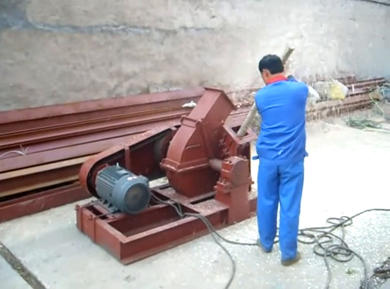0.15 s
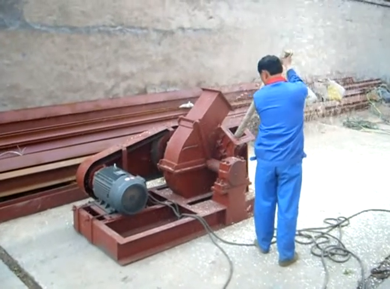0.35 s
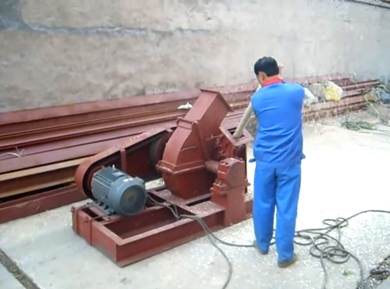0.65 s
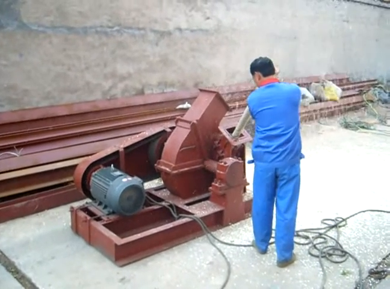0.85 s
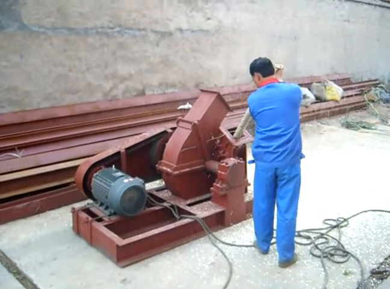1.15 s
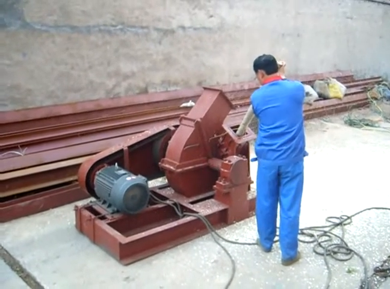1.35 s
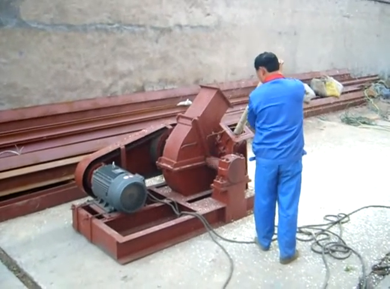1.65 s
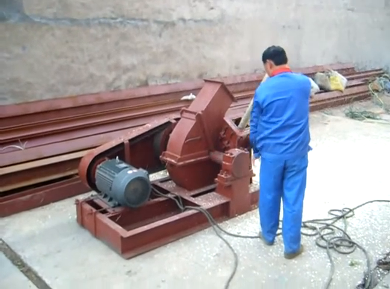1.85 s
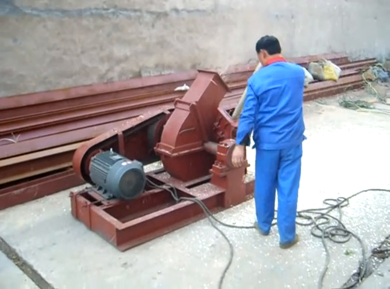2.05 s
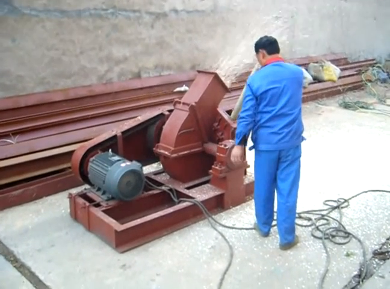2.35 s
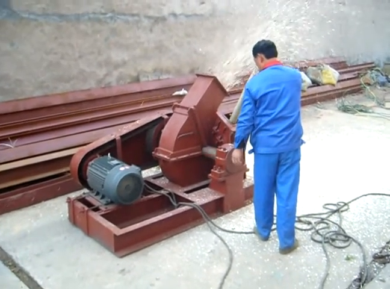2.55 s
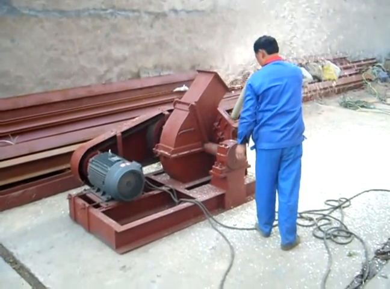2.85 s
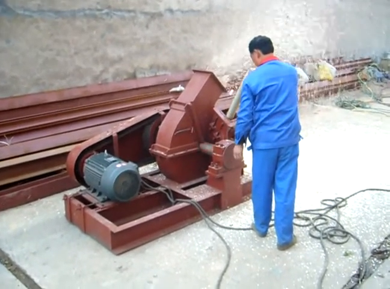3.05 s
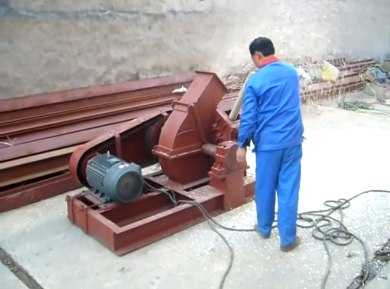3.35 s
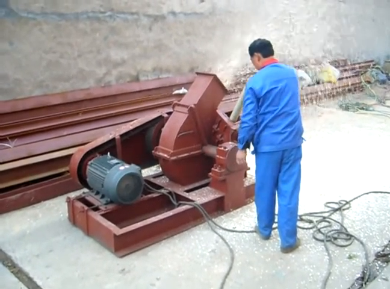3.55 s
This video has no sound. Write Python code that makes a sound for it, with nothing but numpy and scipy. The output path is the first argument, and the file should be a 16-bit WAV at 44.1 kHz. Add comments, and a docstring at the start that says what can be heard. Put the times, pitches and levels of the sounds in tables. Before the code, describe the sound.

Wood chipper idles with pulsing air, then roars harshly as its knives shred a new log.

```python
"""A belt-driven three-knife disc chipper runs in a walled yard: tones hum and pulsing noise is the churned air.
The last log's chips die away as crackling noise, then a new log knocks on the steel chute in decaying tones.
Stray chips rattle as noise bursts and a knife grazes the log. Then the knives bite: each stroke gates
splintering and judder, steel resonances ring, the spout booms on a wandering tone and the wood squeaks.
The yard answers with a short noise tail; the roar overloads a small camera microphone."""
import sys
import numpy as np
from scipy import signal
from scipy.fft import rfft, irfft, next_fast_len
from scipy.io import wavfile
from scipy.ndimage import uniform_filter1d, map_coordinates

SR = 44100
rng = np.random.default_rng(int(sys.argv[2]) if len(sys.argv) > 2 else 0)


def transcribe(signal):
    """Save signal, clipped to [-1, 1], as a 16-bit WAV file at the path in sys.argv[1]."""
    frames = np.atleast_2d(signal).T
    limited = np.clip(frames, -1, 1)
    pcm = np.round(limited * 32767).astype(np.int16)
    wavfile.write(sys.argv[1], SR, pcm)


N = 164052  # 3.72 s
TIME = np.arange(N) / SR

DISC_HZ = 13.75  # turns a second
TURN_SAMPLES = round(SR / DISC_HZ)
# where each of the three knives sits in a turn [lag/s]
KNIFE_LAG_S = [0, 0.0218, 0.0469]
# spectrum of splintering wood [f/Hz, relative level per Hz/dB]
SPLINTER = [(60, -25), (300, -6), (700, -1.5), (1000, 1.5), (1800, -4), (2400, -1), (3300, -14.5),
            (4200, -11), (5200, -11), (6500, -17)]
# spectrum of the log juddering against the anvil [f/Hz, relative level per Hz/dB]
JUDDER = [(25, -13), (78, -19), (105, -3), (140, -6), (175, -7.5), (220, -4), (330, -3), (560, -8),
          (900, -4), (1600, -21.5), (4000, -27.5)]
# load on the machine [t/s, judder level/dB, housing ring level/dB, spout boom level/dB]
LOAD = [(1.92, -31, -48.5, -57), (2.0, -27.5, -34.5, -35), (2.08, -16, -15.5, -21), (2.17, -12, -13, -17),
        (2.32, -13.5, -20.5, -24), (2.52, -15.5, -18.5, -26), (2.75, -10.5, -10.5, -14),
        (3.0, -11, -8.5, -20), (3.2, -9.5, -11, -17), (3.42, -13.5, -6.5, -21), (3.53, -9, -7, -14),
        (3.7, -12, -5, -15)]


def amp(db):
    """Decibels to gain."""
    return 10 ** (np.asarray(db) / 20)


def unit(x):
    """Scale to rms 1."""
    return x / np.sqrt(np.mean(x ** 2) + 1e-20)


def filtered(x, response):
    """x times a response of frequency, padded so that the end does not wrap onto the start."""
    m = next_fast_len(N + SR // 2)
    return irfft(rfft(x, m) * response(np.fft.rfftfreq(m, 1 / SR)), m)[:N]


def coloured(x, points):
    """x shaped by a spectrum of (Hz, dB) points, deep bass rolled off, rms 1."""
    f, db = np.transpose(points)

    def response(hz):
        bass_cut = hz / (hz + 10)
        return amp(np.interp(np.log(hz + 1), np.log(f), db)) * bass_cut
    return unit(filtered(x, response))


def gains(rows):
    """One gain per sample for each dB column after the time; silent before the first row."""
    s, *columns = np.transpose(rows)
    return [amp(np.interp(TIME, s, db, left=-np.inf)) for db in columns]


def wobble(rate):
    """A smooth random curve, rate knots a second."""
    knots = rng.standard_normal(int(N * rate / SR) + 4)
    return map_coordinates(knots, [TIME * rate])


def turning_noise(repeat):
    """Noise of which a share of the power (0 to 1) comes back alike on every turn of the disc."""
    phases = 2 * np.pi * rng.random(TURN_SAMPLES // 2 + 1)
    turn = unit(irfft(np.exp(1j * phases), TURN_SAMPLES))
    return np.sqrt(repeat) * np.resize(turn, N) + np.sqrt(1 - repeat) * rng.standard_normal(N)


def strokes():
    """Strength of the cut: each knife bites, shears through and lets go once a turn."""
    # depth of cut [t/s, first knife relative level/dB, second knife relative level/dB,
    # third knife relative level/dB]
    bite = [(1.93, -23.5, -37, -31), (2.005, -18, -17.5, -16), (2.04, -1.5, -7, -8), (2.12, -3.5, -5, -2.5),
            (2.2, -2.5, -10.5, -5.5), (2.28, -5.5, -12.5, -4.5), (2.5, -8.5, -13, -11.5),
            (2.559, -8, -14.5, -11), (2.641, 1, -4, -7), (2.8, -6.5, -13.5, -7.5),
            (2.899, -4.5, -3.5, -0.5), (3.07, -3, -8, -8), (3.2, -4, -10, -7), (3.421, -14, -15, -4),
            (3.48, -3, -10.5, -4.5), (3.7, -7.5, -6.5, -8.5)]
    bite_phase_s = 2.0355  # a moment when the first knife enters
    attack_s, hold_s, release_s, scatter_db = 0.0064, 0.0077, 0.018, 1.5
    snap_db, snap_s, snap_width_s = -4, 0.0038, .002
    tear_db, tear_hz = 1, 258

    power = np.zeros(N)
    for lag, depth in zip(KNIFE_LAG_S, gains(bite)):
        since = TIME - bite_phase_s - lag
        age = since % (1 / DISC_HZ)
        turn = (since * DISC_HZ // 1).astype(int)
        rise = np.minimum(age / attack_s, 1)
        release = np.exp(-np.maximum(age - attack_s - hold_s, 0) / release_s)
        # the chip cracks off just after the knife enters
        snap = amp(snap_db) * np.exp(-((age - snap_s) / snap_width_s) ** 2)
        scatter = amp(scatter_db * rng.standard_normal(size=64)[turn])
        power += (depth * (rise * release + snap) * scatter) ** 2
    # the fibres give way in like jerks on every turn
    tearing = np.resize(wobble(tear_hz)[:TURN_SAMPLES], N)
    return np.sqrt(power) * amp(tear_db * tearing)


def splinters():
    """Crackling noise of breaking wood; patches in time and frequency give the chips their own colours."""
    repeat, crackle, patchy_db = 0.16, .45, 2.5
    crackling = turning_noise(repeat) * np.exp(crackle * wobble(900))
    z = signal.stft(crackling, nperseg=256)[2]
    patches = uniform_filter1d(rng.standard_normal(z.shape), size=4, axis=0)
    patches = unit(uniform_filter1d(patches, size=8, axis=1))
    patchy = signal.istft(z * amp(patchy_db * patches), nperseg=256)[1][:N]
    return coloured(patchy, SPLINTER)


def cutting():
    """The strokes splinter the wood, shake the log and excite the resonances of the steel housing."""
    # resonances of the steel housing [f/Hz, width/Hz, relative level/dB]
    housing = [(472, 24, -6.5), (646, 30, -7), (830, 37, -7.5), (895, 73, -12), (1025, 20, -2),
               (1150, 54, 2), (1235, 41, -1), (1349, 48, -6.5), (1447, 50, -18), (1697, 48, -8.5),
               (2322, 40, -9.5)]
    # strong multiples of the disc speed under load [multiple of DISC_HZ]
    multiples = [10, 11, 15, 20, 22, 24, 33]
    # their peak levels relative to the judder [level/dB]
    multiples_db = [-13, -14, -12.5, -14, -15, -15, -16]
    splinter_db, judder_repeat, ring_repeat = -2.5, 0.68, 0.11

    cut = strokes()
    beat = cut / (uniform_filter1d(cut, TURN_SAMPLES) + 1e-4)  # pulse of the strokes without their loudness
    cutting_rms = np.sqrt(np.mean(cut > 0))  # makes rms 1 hold over the cutting time alone
    judder_gain, ring_gain, _ = gains(LOAD)
    judder = coloured(beat * turning_noise(judder_repeat), JUDDER) * cutting_rms

    orders = np.zeros(N)
    for k, db in zip(multiples, multiples_db):
        phase = 2 * np.pi * (k * DISC_HZ * TIME + rng.random()) + 0.21 * wobble(6)
        orders += amp(db) * np.sin(phase)

    def steel(f):
        return sum(amp(db) * 1j * f * w / (c * c - f * f + 1j * f * w) for c, w, db in housing)
    ring = unit(filtered(beat * turning_noise(ring_repeat), steel)) * cutting_rms
    return amp(splinter_db) * cut * splinters() + judder_gain * (judder + orders) + ring_gain * ring


def spout():
    """The sheet steel of the spout booms in surges on a wandering tone as chips stream through it."""
    boom_hz, wander_rad, surge_db = 487, .8, 2
    boom_gain = gains(LOAD)[2]
    tone = np.sin(2 * np.pi * boom_hz * TIME + wander_rad * wobble(25))
    return boom_gain * unit(amp(surge_db * wobble(25.03)) * tone)


def squeaks():
    """Short squeals, roughened in phase, where the log rubs on a passing knife."""
    # wood squeaks against the knives [t/s, f/Hz, rms level at the swell's top/dB]
    squeals = [(2.24, 3120, -15), (2.335, 5450, -17.5), (2.39, 5450, -18), (2.41, 5350, -25),
               (2.46, 5400, -20.5), (2.482, 5400, -16.5), (2.53, 5400, -19.5), (2.556, 5450, -15),
               (2.608, 5500, -21), (2.68, 5350, -18), (2.70, 5450, -18), (2.97, 5200, -14.5),
               (3.047, 5500, -16.5), (3.12, 5400, -17), (3.49, 5400, -16), (3.556, 5500, -15)]
    width_s, rough_rad = .01, 1.1
    out = np.zeros(N)
    for s, hz, db in squeals:
        swell = np.exp(-((TIME - s) / width_s) ** 2)
        out += amp(db) * swell * np.sin(2 * np.pi * hz * TIME + rough_rad * wobble(900))
    return np.sqrt(2) * out


def knock():
    """The new log lands on the steel chute: a hard touch and a crack, then decaying modes and clatter."""
    # modes of the struck chute [f/Hz, relative level/dB, t60/s]
    modes = [(430, -1, .1), (509, -2, .1), (651, 2.5, .12), (681, -3.5, .12), (830, -2, .14),
             (1192, 2, .12), (1600, -5.5, 0.25), (1870, -11.5, 0.3), (1950, -7, 0.15), (3241, -15.5, .12)]
    # spectrum of the chute's loose sheet rattling on [f/Hz, relative level per Hz/dB]
    loose_sheet = [(300, -0.5), (700, -6), (1200, 3.5), (2000, -1), (2600, -6.5), (5500, -18)]
    # spectrum of the crack [f/Hz, relative level per Hz/dB]
    crack_colour = [(150, -7), (450, 13), (2000, -21), (3000, -21), (5500, -25)]
    knock_s, ring_db = .4295, -13
    crack_db, crack_t60 = -7, 0.11
    clatter_db, clatter_t60 = -17.5, 0.44
    contact_db, contact_decay_s = -11, .0025

    def noise(colour):
        return coloured(rng.standard_normal(N), colour)

    t = np.maximum(TIME - knock_s, 0)
    ring = sum(amp(db - 60 * t / t60) * np.sin(2 * np.pi * (hz * t + rng.random())) for hz, db, t60 in modes)
    crack = amp(crack_db - 60 * t / crack_t60) * noise(crack_colour)
    clatter = amp(clatter_db - 60 * t / clatter_t60) * noise(loose_sheet)
    contact = amp(contact_db) * np.exp(-t / contact_decay_s) * noise(SPLINTER)
    return (t > 0) * (amp(ring_db) * ring + contact + crack + clatter)


def chips():
    """The last log's chips die away up the spout, strays burst and decay, and a knife grazes the new log."""
    # stray chips rattle in the housing [t/s, level/dB]
    strays = [(.935, -31), (1.085, -27), (1.475, -26), (1.715, -25)]
    stray_decay_s = .022
    graze_s, graze_db, graze_decay_s = 2.012, -14, .03  # before the first full bite
    clear_db, clear_judder_db, clear_db_per_s = -27.5, -14, 80.5

    def burst(s, db, decay_s):
        return amp(db) * (TIME > s) * np.exp(-abs(TIME - s) / decay_s)

    fade = amp(-clear_db_per_s * TIME)
    rattle = sum(burst(s, db, stray_decay_s) for s, db in strays)
    rattle = rattle + burst(graze_s, graze_db, graze_decay_s)
    last_judder = amp(clear_judder_db) * fade * coloured(rng.standard_normal(N), JUDDER)
    return (amp(clear_db) * fade + rattle) * splinters() + last_judder


def idling():
    """The motor and the turning disc hum on steady tones while the passing knives pulse the churned air."""
    # spectrum of the air churned by the disc [f/Hz, relative level per Hz/dB]
    air_colour = [(25, -2), (55, -9), (125, -1.5), (150, -4.5), (215, 0.5), (330, 0.5), (460, -2.5),
                  (540, -8.5), (640, -6.5), (820, -2), (1000, -6), (1100, -5), (1500, -12), (2700, -15),
                  (3500, -20.5), (5200, -25), (6500, -35.5)]
    # steady tones of the motor and the turning disc [f/Hz, rms level/dB]
    hum_tones = [(83, -39.5), (124, -37), (300.3, -26.5), (331, -34), (414.5, -44.5), (861, -41.5),
                 (1093, -36)]
    air_db, air_repeat, air_pulse = -22.5, 0.35, 0.11
    waver_db, drift_rad = 1, 0.17

    knife_hz = len(KNIFE_LAG_S) * DISC_HZ
    fanning = 1 + air_pulse * np.sin(2 * np.pi * knife_hz * TIME)
    air_gain = amp(air_db + 0.63 * wobble(8.05))
    air = air_gain * fanning * coloured(turning_noise(air_repeat), air_colour)
    hum = np.zeros(N)
    for hz, db in hum_tones:
        tone = np.sin(2 * np.pi * hz * TIME + drift_rad * wobble(12))
        hum += amp(db + waver_db * wobble(5.2)) * tone
    return air + np.sqrt(2) * hum


def yard(x):
    """A short answer from the wall and the concrete: decaying noise after an 8 ms gap, unit energy."""
    t60 = 0.27  # s
    t = TIME[:SR // 2]
    tail = rng.standard_normal(len(t)) * amp(-60 * t / t60) * (t > .008)
    return signal.fftconvolve(x, tail / np.linalg.norm(tail))[:N]


def scene():
    """The running machine and the wood that it takes, with the yard's answer to the wood."""
    yard_db = -10.5
    wood = cutting() + spout() + squeaks() + knock() + chips()
    return (idling() + wood + amp(yard_db) * yard(wood))[None]


def clipped(x, top, hardness):
    """Flatten the peaks at top; a greater hardness bends more sharply."""
    return x / (1 + abs(x / top) ** hardness) ** (1 / hardness)


def record(dry):
    """The input overloads, the narrow band of the camera follows, and its output shaves the overshoots."""
    overload, ceiling = 0.67, 0.66  # full scale = 1
    band_hz, band_order, top_hz = 5418, 22.2, 15800

    def band(hz):
        return 1 / np.sqrt(1 + (hz / band_hz) ** (2 * band_order))

    heard = filtered(dry[0], lambda hz: hz < 6300)
    narrow = filtered(clipped(heard, overload, hardness=6.8), band)
    return filtered(clipped(narrow, ceiling, hardness=78), lambda hz: hz < top_hz)[None]


dry = scene()
out = record(dry)
transcribe(out)
```